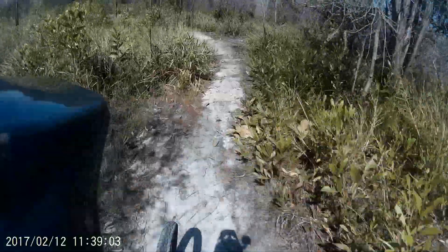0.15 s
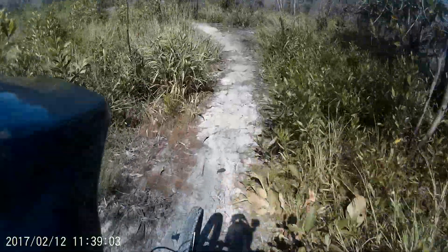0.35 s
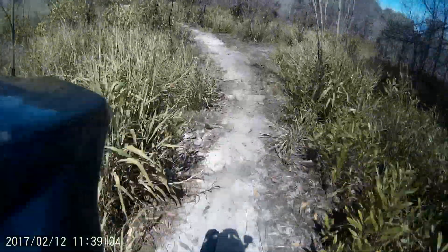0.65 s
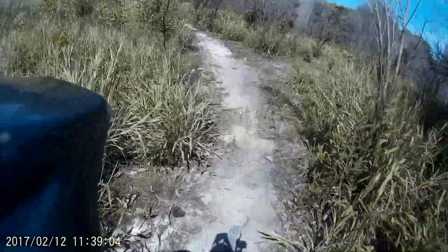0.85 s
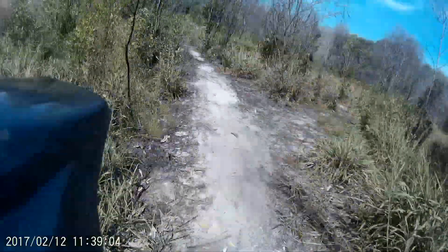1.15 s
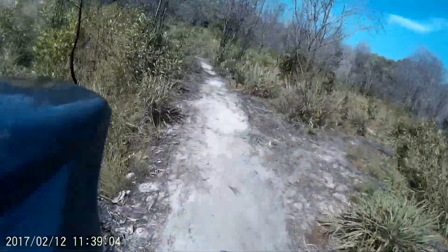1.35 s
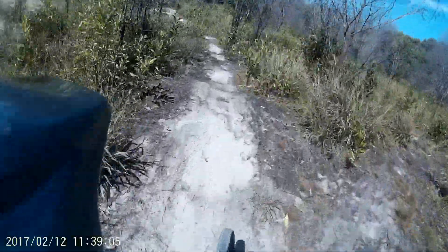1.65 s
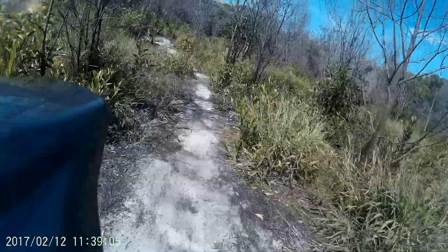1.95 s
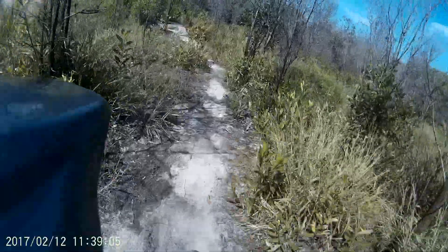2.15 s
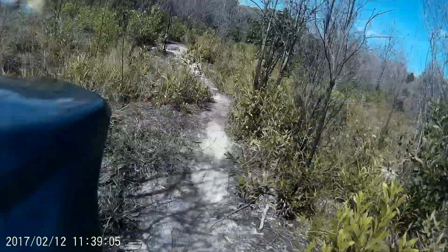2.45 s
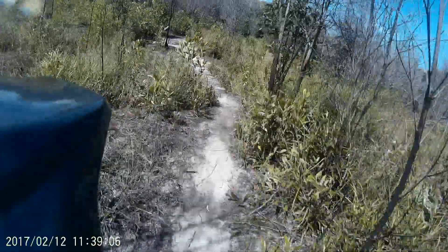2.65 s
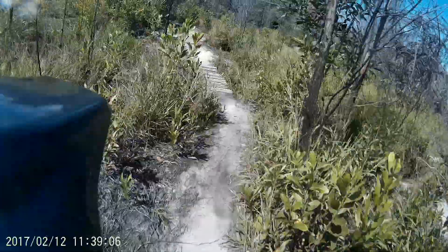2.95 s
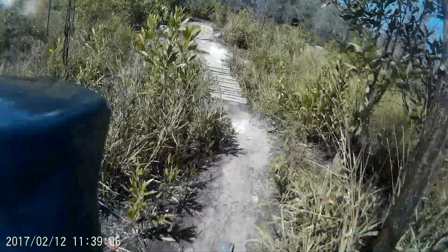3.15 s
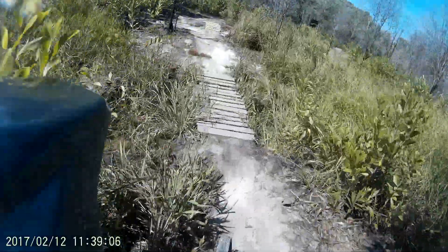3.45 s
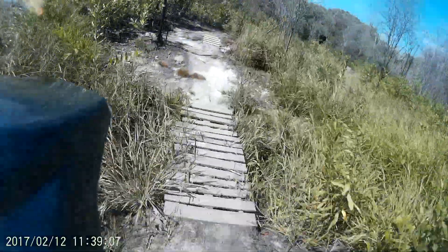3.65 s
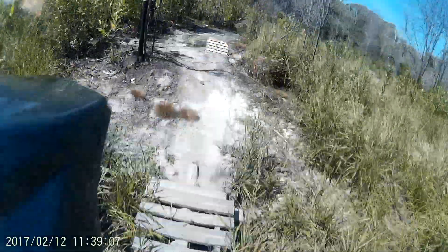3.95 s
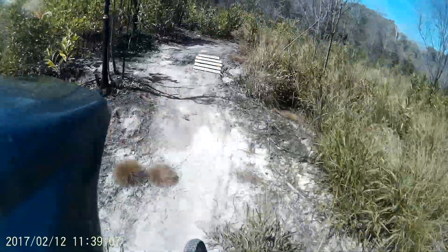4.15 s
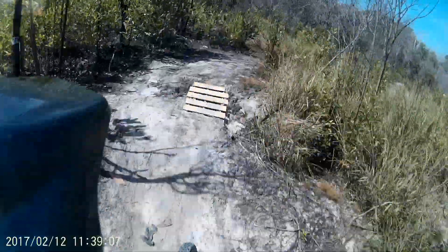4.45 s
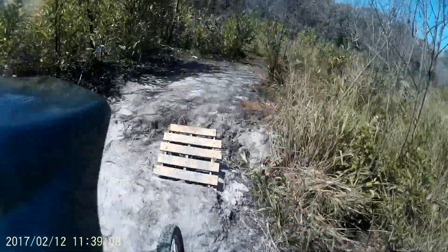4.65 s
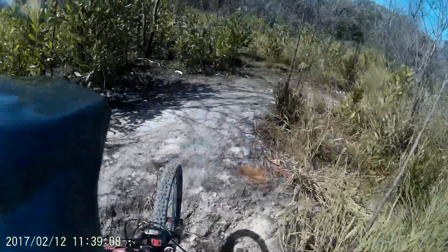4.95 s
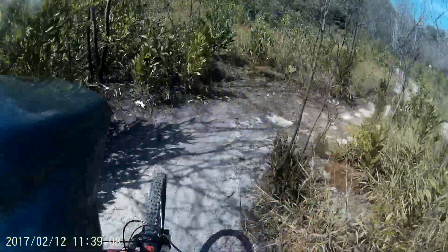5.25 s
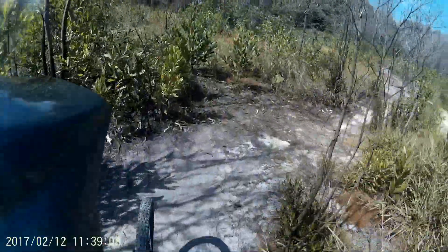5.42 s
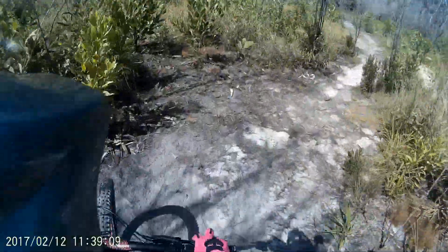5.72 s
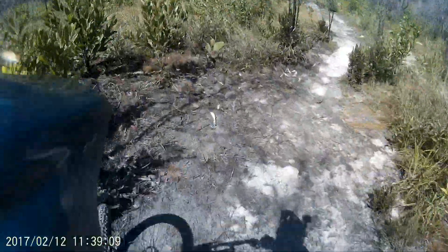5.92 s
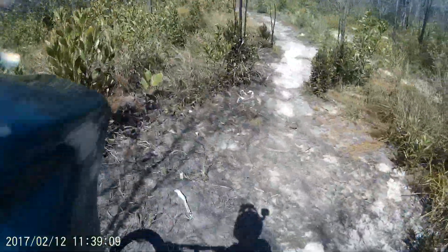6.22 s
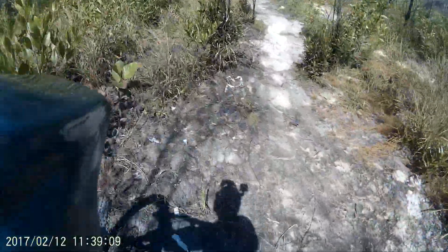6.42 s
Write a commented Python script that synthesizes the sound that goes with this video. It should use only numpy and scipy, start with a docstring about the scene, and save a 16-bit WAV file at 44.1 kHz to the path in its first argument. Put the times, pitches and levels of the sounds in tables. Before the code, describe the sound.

Close, muffled frame-borne rattle of a bike on dry dirt, deep wobbling throbs, loose clacks, and two hard bangs before it quietens.

```python
"""Bicycle on a sandy, stony trail

A small sealed camera clamped to the bicycle hears almost everything through the frame.
Random grains and sudden blows ring the same set of frame modes; slow swings are the mount swaying in
deep throbs, and small parts clack and tick. Behind lie shaped noise, the hiss of the microphone,
and a thin whistle: a high tone that throbs on and off."""
import sys
import numpy as np
from scipy import signal
from scipy.fft import rfft, irfft, next_fast_len
from scipy.io import wavfile
from scipy.ndimage import uniform_filter1d

SR = 44100
rng = np.random.default_rng(int(sys.argv[2]) if len(sys.argv) > 2 else 0)


def transcribe(u):
    """Save the signal u as a 16-bit wav file named by the first command-line argument.

    u: samples, shape (n,) or (channels, n), limited to [-1, 1]; the rate is SR.
    q: integer samples, one column per channel.
    """
    v = np.clip(np.atleast_2d(u).T, -1, 1)
    q = np.round(v * 32767).astype(np.int16)
    wavfile.write(sys.argv[1], SR, q)


N = 290398
TIME = np.arange(N) / SR  # seconds

# Modes, the pitches at which frame and mount ring: pitch_hz [Hz], fade_s [s to fall 60 dB],
# grit_db [dB, strength under grit], clack_db [dB, strength under a clack before its tilt and scatter],
# clack_rise_ms [ms that a clack needs to build the mode up]
FRAME = [(85.3, 0.34, -3, -38, 11), (151, 0.097, -10, -39, 9), (242.8, 0.065, -4.5, -4.5, 6),
         (425, 0.029, -1.5, 11, 4.4), (446, 0.016, 7.5, 9, 4.1), (606.5, 0.019, 1, 18, 2.7),
         (834, 0.038, -3.5, 0.5, 4.1), (1120, 0.061, -5, 5, 1.5), (1368, 0.057, -3.5, 6, 1.1),
         (1600, 0.011, 3, -9, 2.5), (1995, 0.012, -3.5, 17.5, 0.66), (2161, 0.0097, -7.5, -18, 1.1),
         (2407, 0.024, -14, 4.5, 1), (3000, 0.02, -16.5, 9.5, 0.47), (3380, 0.046, -44.5, -22, 0.35),
         (3700, 0.026, -27.5, 13, 1), (4230, 0.025, -16.5, -5.5, .6), (4540, 0.085, -19, -10, .6),
         (5250, 0.018, -26, -9, .4), (7380, .01, -24.5, -32, .4)]


def gain_of(db):
    """Turns decibels into a factor."""
    return 10 ** (np.asarray(db) / 20)


def evened(x):
    """Scales a sound to an average strength (rms) of 1."""
    return x / np.sqrt(np.mean(x ** 2) + 1e-20)


def columns(rows):
    """Draws straight lines between the rows of a table: one value a sample for each column."""
    times_s, *values = np.transpose(rows)
    return [np.interp(TIME, times_s, column) for column in values]


def add(mix, start_s, sound):
    """Mixes a sound in at start_s seconds."""
    part = mix[round(start_s * SR):][:len(sound)]
    part += sound[:len(part)]


def coloured(x, points):
    """Filters x along a curve of (Hz, dB) points, then scales it to rms 1."""
    point_hz, point_db = np.transpose(points)
    size = next_fast_len(len(x))
    hz = np.fft.rfftfreq(size, 1 / SR)
    curve_db = np.interp(np.log(hz + 1), np.log(point_hz + 1), point_db)
    return evened(irfft(rfft(x, size) * gain_of(curve_db), size)[:len(x)])


def drift(ms):
    """Smooth random wandering of rms 1 that changes in about ms milliseconds."""
    size = max(round(ms * SR / 1000), 1)
    smoothed = uniform_filter1d(rng.standard_normal(N), size)
    return evened(uniform_filter1d(smoothed, size))


def grains(spread_db, clumps_db):
    """Noise whose samples differ much in size and come in clumps."""
    size_db = spread_db * np.minimum(rng.exponential(1, N), 6)
    return rng.standard_normal(N) * gain_of(size_db + clumps_db * drift(ms=17.5))


def ringing(levels_db, rise_ms):
    """The frame's answer to one tap: fading tones, neighbouring modes swinging in opposite sense."""
    t = TIME[:SR // 3, None]
    hz, fade_s = np.transpose(FRAME)[:2]
    swell = 1 - np.exp(-(t * 1000 / rise_ms) ** 2)
    fade = gain_of(levels_db - 60 * t / fade_s)
    signs = (-1.) ** np.arange(len(hz))
    return (fade * swell * np.sin(2 * np.pi * hz * t)) @ signs


def grit_ring(colour_db=0):
    """The frame's ring under grit: each mode gets its own power, however long it rings."""
    _, fade_s, grit_db, *_ = np.transpose(FRAME)
    return ringing(grit_db - 10 * np.log10(fade_s) + colour_db, 0.017)


def lowest_mode(rise_ms):
    """The ring of the deepest mode alone, scaled to a peak of 1."""
    is_first = np.arange(len(FRAME)) == 0
    ring = ringing(np.where(is_first, 0, -200), rise_ms)
    return ring / abs(ring).max()


def rolling():
    """Dense grains under the tyres ring the frame; finer sand adds a swelling hiss; the mount rocks."""
    # Rolling over time: start_s [s], grit_db [dB, level of the ringing grit],
    # sand_db [dB, level of the sand hiss]
    roll_levels = [(0.0, -52.5, -70), (0.38, -55, -71.5), (0.7, -52, -68.5), (0.95, -58.5, -76),
                   (1.34, -50.5, -62), (1.5, -57, -76), (1.7, -53.5, -67), (1.96, -52, -68.5),
                   (2.23, -64, -75.5), (2.55, -54.5, -66.5), (2.9, -57, -74.5), (3.26, -56.5, -70),
                   (3.59, -54.5, -69), (3.72, -48.5, -59), (4.01, -53, -67.5), (4.2, -55.5, -68),
                   (4.47, -55.5, -68), (4.58, -53, -63), (4.72, -62, -73.5), (5.06, -61, -70.5),
                   (5.4, -63, -78), (5.64, -53, -64), (5.77, -57, -64), (5.92, -60, -74),
                   (6.17, -61.5, -67.5), (6.58, -67.5, -82.5)]
    # Shudder of the deep modes: start_s [s], level_db [dB, before it wanders]
    shudder_levels = [(0, -56), (0.65, -63), (0.95, -61), (1.3, -56.5), (2.25, -61), (2.8, -59.5),
                      (3.5, -66), (4.0, -48.5), (4.4, -62), (5.05, -64.5), (5.3, -56.5), (5.75, -60),
                      (6.0, -63), (6.58, -73.5)]
    # Colour of the grit's broad, unringing part: pitch_hz [Hz], level_db [dB per Hz]
    grit_colour = [(59, -35.5), (100, 5), (524, -7), (736, -4.5), (839, -21.5), (1220, -6.5), (1560, -17),
                   (2650, -17.5), (9000, -37), (11700, -70), (19800, -120)]
    # Colour of the sand hiss: pitch_hz [Hz], level_db [dB per Hz]
    sand_colour = [(1500, -27), (3000, 3), (4500, 1.5), (6000, -3.5), (7700, -1.5), (10000, -6),
                   (16000, -6)]
    # Colour of the rocking: pitch_hz [Hz], level_db [dB per Hz]
    rocking_colour = [(5.9, -24.5), (10, 4), (30, -1.5), (54, -8), (70, -17), (91, -45), (150, -120)]

    grit_db, sand_db = columns(roll_levels)
    # The rocking follows the grit: 0.82 dB for each dB away from the usual grit level
    usual_grit_db, usual_rocking_db, follows = -55, -46.5, 0.82
    rocking_db = usual_rocking_db + follows * (grit_db - usual_grit_db) + 2.35 * drift(ms=99.0)
    shudder_db = columns(shudder_levels)[0] + 4.2 * drift(ms=150.0)

    deep = np.transpose(FRAME)[0] < 300  # Hz
    high_ring = grit_ring(np.where(deep, -200, 0))
    deep_ring = grit_ring(np.where(deep, 0, -200))

    rung = evened(signal.oaconvolve(grains(0.99, 2.03), high_ring)[:N])
    broad = coloured(grains(0.56, 2.1), grit_colour)
    grit = gain_of(grit_db) * (rung + gain_of(-2.0) * broad)
    sand = coloured(grains(2.8, 1.85), sand_colour)
    rocking = coloured(rng.standard_normal(N), rocking_colour)
    shudder = evened(signal.oaconvolve(grains(0.43, 1.8), deep_ring)[:N])
    return grit + gain_of(sand_db) * sand + gain_of(rocking_db) * rocking + gain_of(shudder_db) * shudder


def whistle():
    """A faint high tone, on and off at an even pace, its level wandering a little."""
    pitch_hz, throb_hz, level_db = 9525.4, 36.36, -81.5
    throb = np.cos(2 * np.pi * throb_hz * (TIME - .0026))
    gate = np.clip(.45 + 1.5 * throb, 0, 1)
    tone = gate * np.sin(2 * np.pi * pitch_hz * TIME)
    return gain_of(level_db + 1.5 * drift(ms=230.0)) * evened(tone)


def sway():
    """Each bump rocks the camera on its clamp: a swing or two, quickening as the clamp stiffens."""
    # Bumps: middle_s [s], level_db [dB, peak], pitch_hz [Hz at the middle of the swing]
    jolts = [(0.123, -40, 27.1), (0.573, -31, 31.4), (0.691, -41, 35.5), (1.152, -34.5, 32.2),
             (1.223, -38, 36.9), (1.277, -23.5, 35.7), (1.72, -28.5, 33.8), (1.877, -28.5, 41.2),
             (1.938, -32.5, 31.9), (2.474, -29.5, 37.7), (2.675, -33.4, 32.5), (3.189, -38, 25.4),
             (3.445, -35.5, 34.5), (3.563, -35, 28.6), (3.668, -30, 26.1), (3.735, -26.5, 33.8),
             (3.995, -27, 40.3), (4.085, -33, 38.4), (4.168, -38, 32.6), (4.24, -34, 30),
             (4.329, -40, 25.7), (4.419, -33.5, 36.9), (4.5, -32.5, 30), (4.593, -34, 29.9),
             (4.659, -41, 33), (4.839, -40.5, 35), (4.93, -43, 27.6), (5.06, -43, 39.4),
             (5.591, -31.5, 38.2), (5.655, -29, 38.1), (5.707, -37, 38.7), (5.951, -39.5, 32.8)]
    swings, swings_per_db, usual_db = 1.0, 0.16, -31  # bumps above the usual level swing longer
    out = np.zeros(N + SR)
    t = TIME[:SR // 4] - 1 / 8  # seconds from the middle of the swing
    for middle_s, level_db, hz in jolts:
        width_ms = 1000 / hz * (swings + swings_per_db * max(level_db - usual_db, 0))  # at half height
        swing = np.cos(2 * np.pi * hz * t * (1 + 3.0 * np.clip(t, -.08, .08)))
        shape = np.exp(-np.log(4) * (t * 1000 / width_ms) ** 2 * 2)
        add(out, middle_s, gain_of(level_db) * shape * swing)
    return out[SR // 8:][:N]  # puts each middle at its own time


def scuffs():
    """Short runs of uneven coarse grains, quick to start and slower to end, scrape and ring the frame."""
    # Scuffs: start_s [s], level_db [dB, rms before the rise and fade], pitch_hz [Hz, middle of the band],
    # fade_ms [ms, how long the fade takes to reach about a third]
    scuff_list = [(.255, -56, 1500, 17), (1.24, -48, 4200, 18), (1.327, -44.5, 1600, 25),
                  (1.385, -48.5, 4220, 12), (1.784, -45, 1500, 7.4), (3.41, -52.5, 1390, 25),
                  (3.44, -54, 1600, 69), (3.671, -52.5, 3220, 30), (3.71, -50.5, 3600, 60),
                  (3.764, -54.5, 4520, 60), (3.914, -49, 2400, 46), (3.968, -31.5, 950, 20),
                  (3.984, -47, 1100, 11), (4.112, -45, 1700, 8), (4.14, -39.5, 1180, 14.6),
                  (4.176, -42, 1650, 17), (4.345, -44.5, 1240, 18), (4.523, -52.5, 2760, 35),
                  (4.56, -58, 1600, 63), (4.869, -49, 2100, 27), (4.913, -52, 1820, 39),
                  (5.23, -57.5, 1600, 18), (5.569, -52, 2240, 12), (5.58, -46, 1600, 9.2),
                  (5.616, -50, 2200, 16), (5.628, -45, 2000, 6.3), (5.652, -37.5, 1500, 12),
                  (5.67, -28.5, 3380, 5.5)]
    octaves = 1.53  # distance from the middle at which ringing is 12 dB and scraping 30 dB weaker
    out, t, modes_hz = np.zeros(N), TIME[:5000], np.transpose(FRAME)[0]
    size = gain_of(6.0 * np.minimum(rng.exponential(1, (len(scuff_list), len(t))), 6))
    coarse_grains = size * rng.standard_normal(size.shape)
    for (start_s, level_db, hz, fade_ms), grit in zip(scuff_list, coarse_grains):
        u = t * 1000 / fade_ms
        shape = np.minimum(u / 0.073, 1) * np.exp(-u ** 1.2)
        band_db = -12 * (np.log2(modes_hz / hz) / octaves) ** 2
        rung = evened(signal.fftconvolve(grit, grit_ring(band_db))[:len(t)])
        band = [(hz / 2 ** octaves, -30), (hz, 0), (hz * 2 ** octaves, -30), (20000, -60)]
        scrape = coloured(grit, band)
        add(out, start_s, gain_of(level_db) * shape * evened(rung + 0.37 * scrape))
    return out


def clacks():
    """A loose part hits the frame: high modes answer first; the place of the blow favours every other one."""
    # Clacks: start_s [s], level_db [dB, peak of the first hit], place [-1..1, where the blow lands]
    clack_list = [(1.224, -24.5, 0.35), (1.779, -34, .37), (2.219, -46, 0.37), (2.435, -27.5, 0.19),
                  (5.864, -36.5, 0.24), (6.0505, -27.5, 0.26)]
    tilt_db, scatter_db = -2.5, 2  # dB per octave; random dB, different for each mode and clack
    out = np.zeros(N)
    hz, _, _, clack_db, rise_ms = np.transpose(FRAME)
    scatter = scatter_db * rng.standard_normal((len(clack_list), len(hz)))
    for (start_s, level_db, place), chance_db in zip(clack_list, scatter):
        favour_db = 7.4 * place * (-1.) ** np.arange(len(hz)) + chance_db
        modes_db = clack_db + favour_db + tilt_db * np.log2(hz / 1400)
        ring = ringing(modes_db, np.maximum(rise_ms, .1))
        ring = ring / abs(ring).max()
        add(out, start_s, gain_of(level_db) * ring)
        add(out, start_s + 0.0023, gain_of(level_db - 7.0) * ring)  # the part bounces once
    return out


def knocks():
    """Blows are short dead swings on two pitches with a crack on top; heavy ones also wake the low modes."""
    # Knocks: start_s [s], level_db [dB, top of the lower pitch's swell], low_hz [Hz], high_hz [Hz],
    # high_db [dB, upper pitch against lower], rise_ms [ms], crack_db [dB, crack noise before its shape]
    knock_list = [(1.272, -36.5, 1600, 2470, -4, 2.4, -52), (1.289, -38, 2200, 3000, -2, 0.83, -60),
                  (1.295, -38.5, 1700, 3600, -5, 0.57, -60), (1.336, -42, 1800, 3550, -8, 1.6, -60),
                  (1.86, -38.5, 470, 1160, -16, 5.1, -64), (3.728, -38.5, 2190, 4200, -1, 1.2, -61),
                  (3.9646, -3, 557, 1269, -2.5, 1.8, -46.5), (3.966, -21.5, 1710, 2310, -19, 2, -60),
                  (3.97, -29, 494, 1280, 12, 1.3, -60), (3.977, -33, 890, 1890, -14, 3.2, -60),
                  (4.137, -31.5, 990, 1510, -2, 2, -62), (4.201, -40.5, 1480, 4000, -21, 1.9, -60),
                  (4.521, -48, 1750, 2860, 1, 1.7, -47), (4.876, -39, 1800, 2770, -10, 0.59, -60),
                  (5.626, -34, 1970, 3630, -10, 1.7, -63), (5.6468, -7, 1404, 3100, -26.5, 1.82, -49.5),
                  (5.6513, -19, 1430, 3330, -12.5, 0.83, -41), (5.657, -29, 1350, 3300, -14, 0.22, -53),
                  (5.6706, -20.5, 1760, 3070, -8.5, 0.98, -47.5)]
    # Heavy blows: start_s [s], body_db [dB, peak of the low ring], thud_db [dB, peak of the deepest mode]
    thumps = [(1.861, -38.5, -64), (3.912, -39, -34.5), (3.9646, -12, -27), (4.137, -50, -45),
              (4.201, -42.5, -53), (5.627, -37.5, -41.5), (5.6475, -17, -55), (5.657, -29, -47),
              (5.6701, -28, -35)]
    out, t, modes_hz = np.zeros(N), TIME[:900], np.transpose(FRAME)[0]

    body = ringing(-5. * np.log2(modes_hz / 350) ** 2, 0.94)  # strongest near 350 Hz
    body = body * gain_of(-60 * TIME[:SR // 3] / 0.045)  # damped by the load
    body = body / abs(body).max()
    thud = lowest_mode(6.0)

    noise = rng.standard_normal((len(knock_list), len(t)))
    cracks = signal.lfilter([.4], [1, -.6], noise)  # weaker in the top
    for (start_s, level_db, low_hz, high_hz, high_db, rise_ms, crack_db), crack in zip(knock_list, cracks):
        u = t * 1000 / max(rise_ms, .2)
        low = np.sin(2 * np.pi * low_hz * t)
        high = gain_of(high_db) * np.sin(2 * np.pi * high_hz * t)
        swell = (u * np.exp(.5 - u ** 2 / 2)) ** 2.35
        add(out, start_s, gain_of(level_db) * swell * (low + high))
        add(out, start_s, gain_of(crack_db) * u * np.exp(1 - 1.5 * u) * evened(crack))
    for start_s, body_db, thud_db in thumps:
        add(out, start_s, -gain_of(body_db) * body + gain_of(thud_db) * thud)
    return out


def ticks():
    """A small loose part makes tiny rough pings that swell and fade."""
    # Ticks: start_s [s], level_db [dB, top of the swell before the flutter], length_ms [ms]
    tick_list = [(1.62, -51.5, 18), (3.927, -51, 7), (4.0744, -57, 9), (4.4762, -53.5, 11),
                 (5.032, -60.5, 16), (5.7074, -44.5, 6.2), (5.7834, -53, 8)]
    usual_hz, spread = 4270, 0.017  # spread is a share of the pitch
    out, t = np.zeros(N), TIME[:1000]
    noise = rng.standard_normal((len(tick_list), len(t)))
    flutters = evened(uniform_filter1d(noise, size=40, axis=1))
    pitches = usual_hz * (1 + spread * rng.standard_normal(len(tick_list)))
    for (start_s, level_db, length_ms), hz, flutter in zip(tick_list, pitches, flutters):
        shape = np.sin(np.pi * np.minimum(t * 1000 / length_ms, 1) ** 0.74) ** 2
        ping = (1 + 0.5 * flutter) * np.sin(2 * np.pi * hz * t)
        add(out, start_s, gain_of(level_db) * shape * ping)
    return out


def scene():
    """Everything that shakes the camera, and the whistle, in one channel."""
    mix = rolling() + whistle() + sway() + scuffs() + clacks() + knocks() + ticks()
    return mix[None]


def record(dry):
    """The microphone adds hiss, a hard ceiling flattens whatever exceeds it, and the top band is cut off."""
    # Colour of the microphone hiss: pitch_hz [Hz], level_db [dB per Hz]
    hiss_colour = [(1470, -42), (2500, -3.5), (3890, -9), (4210, -7), (13700, -7), (15200, -13.5),
                   (16000, -26)]
    hiss_db, ceiling, edge_hz = -71.5, .708, 15750  # the ceiling is a share of full scale
    hiss = coloured(rng.standard_normal(N), hiss_colour)
    wet = np.clip(dry + gain_of(hiss_db) * hiss, -ceiling, ceiling)
    low_pass = signal.firwin(511, edge_hz, window=("kaiser", 9), fs=SR)
    return signal.oaconvolve(wet, low_pass[None], "same")


dry = scene()
out = record(dry)
transcribe(out)
```